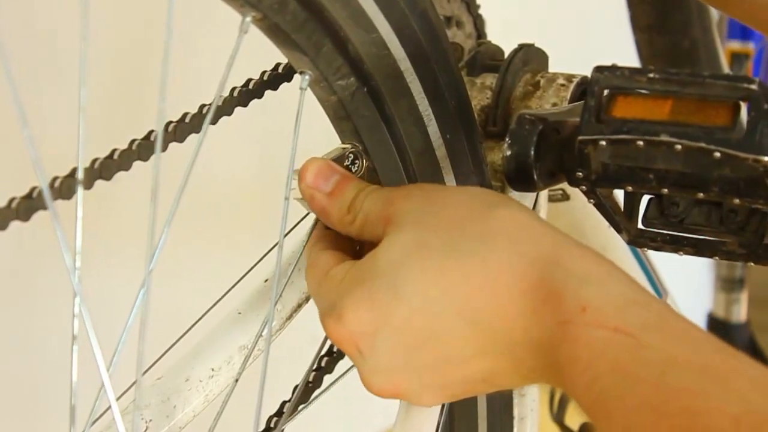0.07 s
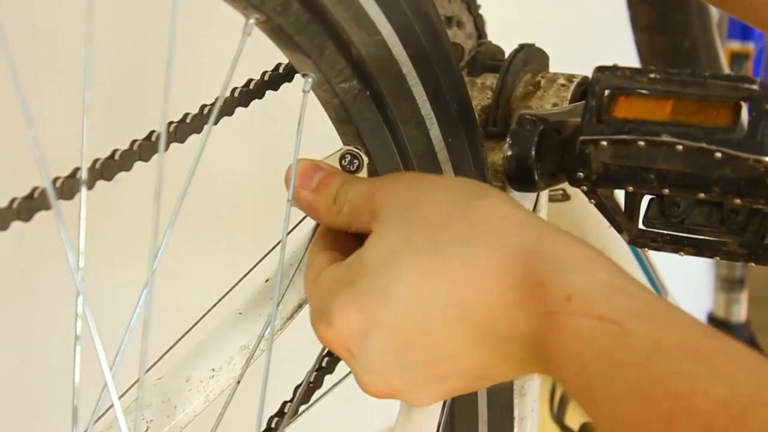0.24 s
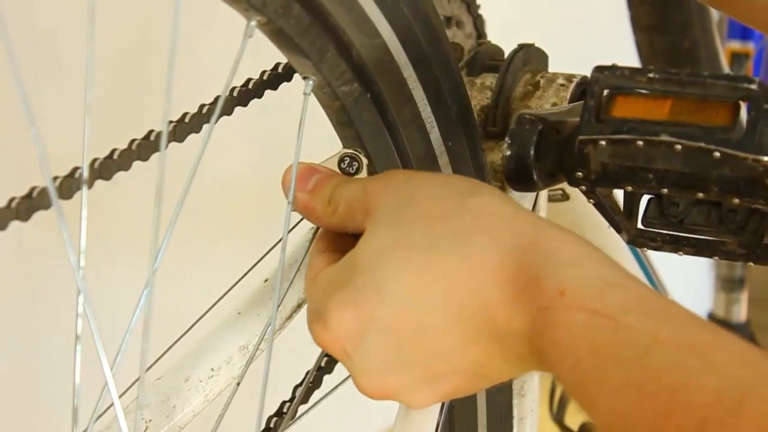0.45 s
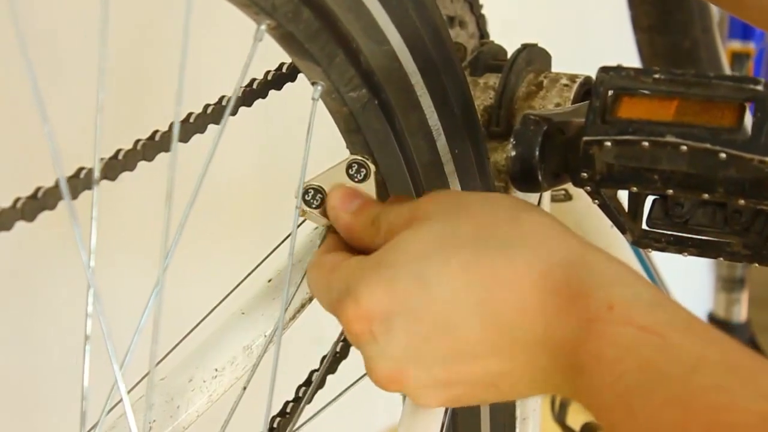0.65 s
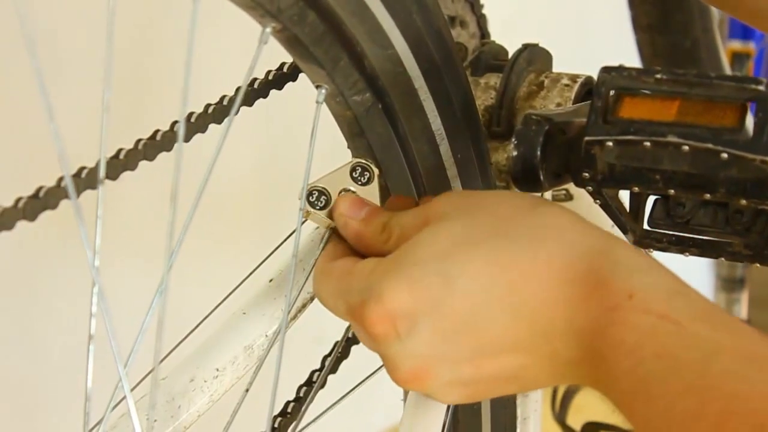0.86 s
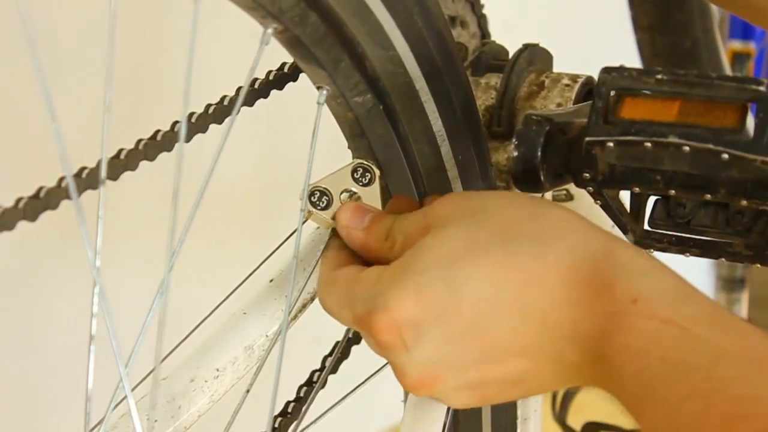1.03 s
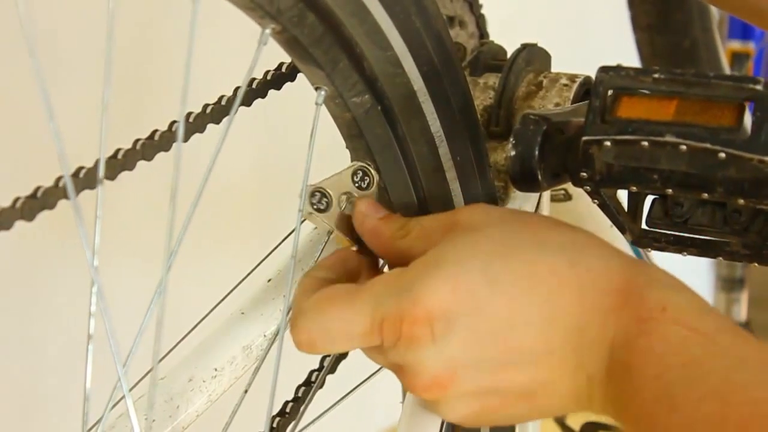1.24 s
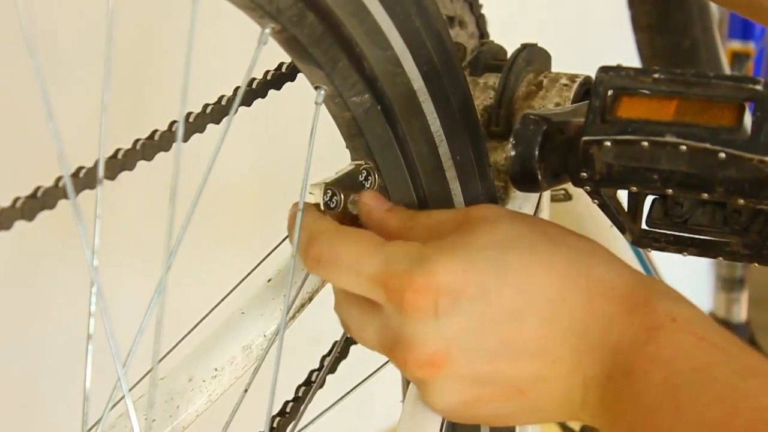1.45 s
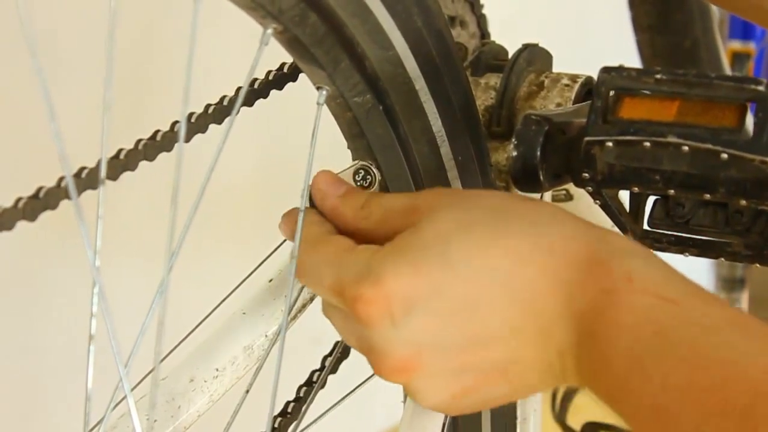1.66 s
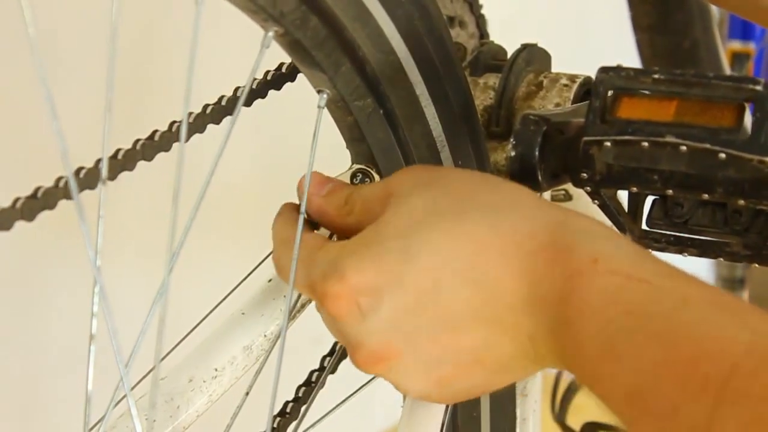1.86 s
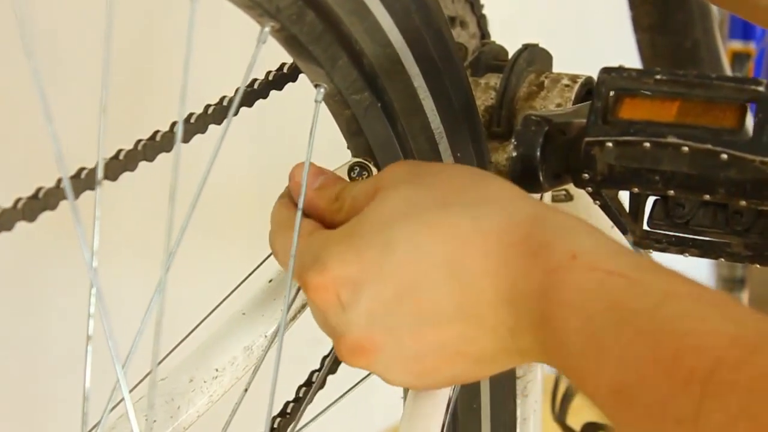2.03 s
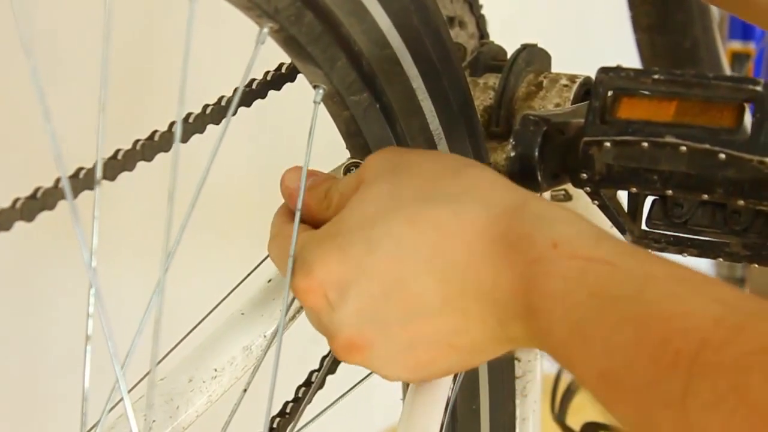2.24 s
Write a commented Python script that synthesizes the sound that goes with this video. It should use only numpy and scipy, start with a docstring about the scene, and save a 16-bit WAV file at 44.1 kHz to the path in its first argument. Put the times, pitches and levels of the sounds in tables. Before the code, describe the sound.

One ringing ping from a bicycle spoke being turned, then a wrench scrapes and clinks briefly.

```python
"""Turning a tight bicycle spoke

In a quiet workshop, a spoke wrench turns a tight nipple, the small nut at the end of a spoke.
The nipple lets go with one sharp crack, and its metallic ring lingers in the room. A second later
the wrench slips off and is put back on with a few scraping clinks, which echo in the small room.
A low hum lies behind it all."""
import sys
import numpy as np
from scipy import signal
from scipy.fft import rfft, irfft
from scipy.io import wavfile

SR = 44100
rng = np.random.default_rng(int(sys.argv[2]) if len(sys.argv) > 2 else 0)


def waveform_to_disk(signal):
    """Save audio, clipped to [-1, 1], as 16-bit WAV at the path in sys.argv[1]."""
    frames = np.transpose(np.atleast_2d(signal))
    scaled = np.clip(frames, -1, 1) * 32767
    samples = np.round(scaled).astype(np.int16)
    wavfile.write(sys.argv[1], SR, samples)


N = 101429  # 2.3 seconds
TOP_HZ = 15700  # upper edge of the treble


def gain(db):
    """Turn decibels into a number to multiply by."""
    return 10 ** (np.asarray(db) / 20)


def read_curve(points, hz):
    """Read between (pitch_hz, value) points, giving every octave equal space."""
    pitches, values = np.array(points, float).T
    return np.interp(np.log(np.maximum(hz, 1)), np.log(pitches), values)


def drift(steps_per_s):
    """A random wander in strength and phase that makes a tone waver."""
    steps = rng.standard_normal((256, 2)) @ np.array([1, 1j])
    return np.interp(np.arange(N) / SR * steps_per_s, np.arange(len(steps)), steps)


def shape_tone(sound, tone, peaks=()):
    """Filter by a tone curve with peaks on top; white noise keeps its overall level."""
    size = 4096
    hz = np.arange(size // 2 + 1) * SR / size
    peaks_db = sum(lift / (1 + (2 * (hz - pitch) / width) ** 2) for pitch, width, lift in peaks)
    cepstrum = irfft(np.log(gain(read_curve(tone, hz) + peaks_db)))
    # fold it so the filter rings only after a hit, never before
    cepstrum[1:size // 2] *= 2
    cepstrum[size // 2 + 1:] = 0
    response = irfft(np.exp(rfft(cepstrum)))
    return signal.fftconvolve(sound, response / np.sqrt(np.sum(response ** 2)))[:N]


def noise(tone, peaks=(), envelope=1):
    """Hiss that follows a loudness outline (the envelope), then has its tone shaped."""
    return shape_tone(rng.standard_normal(N) * envelope, tone, peaks)


def fade(start_s, fade_s, hold_s=0):
    """Start suddenly, hold, then drop by 60 dB every fade_s seconds."""
    t = np.arange(N) / SR - start_s
    return (t >= 0) * np.exp(-np.log(1000) * np.maximum(t - hold_s, 0) / fade_s)


def fading_noise(start_s, fades, hold_s):
    """A burst of hiss in which each range of pitches dies away at its own speed."""
    spectrum = rfft(rng.standard_normal(N))
    hz = np.arange(N // 2 + 1) * SR / N
    pitches = [pitch for pitch, _ in fades]
    burst = 0
    for share, (_, fade_s) in zip(np.eye(len(fades)), fades):
        band = irfft(spectrum * read_curve(list(zip(pitches, share)), hz), N)
        burst += band * fade(start_s, fade_s, hold_s)
    return burst


def ring(start_s, notes):
    """Struck metal: gently wavering notes, together starting at a level of about 1."""
    t = np.arange(N) / SR - start_s
    ringing = 0
    for hz, db, hold_s, fade_s in notes:
        waver = 1 + .3 * drift(steps_per_s=26)
        wave = np.exp(2j * np.pi * (hz * t + rng.random()))
        ringing += gain(db) * np.imag(waver * wave) * fade(start_s, fade_s, hold_s)
    return ringing / np.sqrt(sum(gain(note[1]) ** 2 for note in notes) / 2)


# Tone of the room's steady noise: pitch_hz, relative_level_db
AIR_TONE = [(20, -34), (45, -9), (100, -10.5), (135, -6), (170, 1), (300, -6.5), (600, -7), (1000, -4.5),
            (2000, -17.5), (3200, -24), (8000, -29), (15500, -33.5)]
# Notes of the hum: pitch_hz, level_db
HUM_NOTES = [(123, -65.5), (156, -64.5), (244, -64), (670, -76)]


def background():
    """Soft, steady room noise with a few wavering hum notes."""
    t = np.arange(N) / SR
    hum = 0
    for hz, db in HUM_NOTES:
        note = np.real(drift(steps_per_s=6.2) * np.exp(2j * np.pi * hz * t))
        hum += gain(db) * note / np.sqrt(np.mean(note ** 2))
    return gain(-48) * noise(AIR_TONE) + hum


# How long the echo lasts: pitch_hz, fade_s
ECHO_FADES = [(300, 0.93), (2000, 0.92), (5000, 0.88), (9000, 0.37), (15000, .3)]
# Tone of the echo: pitch_hz, relative_level_db
ECHO_TONE = [(300, 8.5), (2000, 3), (4500, -1), (8000, -0.5), (15000, 1.5)]


def room_echo(sound):
    """The workshop sends back a blurred echo that gets duller as it fades."""
    echo = fading_noise(start_s=0.007, fades=ECHO_FADES, hold_s=0.0067)
    echo = shape_tone(echo / np.sqrt(np.sum(echo ** 2)), ECHO_TONE)
    return gain(-5.5) * signal.fftconvolve(sound, echo)[:N]


# Each touch of the wrench: start_s, knock_db, chink_db, chink_pitch_hz, scrape_db, scrape_fade_s
TOUCHES = [(1.1173, -70, -49, 4900, -63, 0.027), (1.125, -48.5, -43, 3930, -53, 0.055),
           (1.2755, -33.5, -46, 4400, -34, 0.14), (1.2897, -25, -35, 4400, -33.5, 0.12),
           (1.2952, -19.5, -34.5, 4400, -37.5, 0.12), (1.311, -20.5, -36.5, 4400, -37, 0.04),
           (1.3935, -24.5, -34.5, 4325, -55, 0.066), (1.4578, -35, -64, 4480, -42, 0.07),
           (1.4645, -40, -60, 4400, -32.5, 0.06), (1.4700, -24, -62, 4500, -43, 0.026),
           (1.6026, -43, -63, 4400, -50.5, 0.071)]
# Tones of the knock on the spoke, the chink of the jaws and the scrape: pitch_hz, relative_level_db
KNOCK_TONE = [(150, -27), (420, -17), (900, -12), (1100, -18.5), (1500, -3), (1700, -5.5), (2100, 2),
              (2550, -7.5), (3200, -8.5), (3900, -29), (8000, -40)]
CHINK_TONE = [(1000, -12), (2800, -1), (3600, 2.5), (4100, -3.5), (4800, -12.5), (5800, -13), (12000, -30)]
SCRAPE_TONE = [(1000, -14.5), (3000, 3), (6200, -6), (7400, 1.5), (10000, -5), (11300, -4), (12500, -6.5),
               (15400, -10), (16000, -16)]
# Pitches the wrench itself boosts: pitch_hz, width_hz, boost_db
WRENCH_BOOSTS = [(3200, 200, 4), (4020, 160, 5), (4400, 150, 8), (4720, 130, 7), (5550, 200, 5),
                 (7870, 200, 8), (9100, 300, 5), (11170, 200, 10), (11850, 300, 5), (13150, 350, 8),
                 (14930, 150, 8)]
# Notes of the wrench against the spoke: pitch_hz, relative_level_db, hold_s, fade_s
WRENCH_NOTES = [(1490, -8, 0, .5), (1825, -8, 0, .5), (1903, -3, 0, .6), (2075, -3, 0, .55),
                (2172, 0, 0, .6), (2420, -8, 0, .5)]


def wrench_clinks():
    """Each touch scrapes, chinks and knocks, leaving the metal ringing; the room answers."""
    t = np.arange(N) / SR
    knock, chink, ringing = 0, 0, 0
    # the jaws slide along the spoke, loudest at 1.27 s, just before the main knocks
    scrape = gain(-55) * np.exp(-np.abs(t - 1.27) / 0.082)
    for start_s, knock_db, chink_db, chink_hz, scrape_db, scrape_fade_s in TOUCHES:
        # hypot adds up the energy of touches that overlap
        knock = np.hypot(knock, gain(knock_db) * fade(start_s, fade_s=0.039))
        chink = np.hypot(chink, gain(chink_db) * fade(start_s, fade_s=0.066))
        scrape = np.hypot(scrape, gain(scrape_db) * fade(start_s, scrape_fade_s))
        ringing += gain(knock_db - 15.5) * ring(start_s, WRENCH_NOTES)
        # the two jaws ring at slightly different pitches
        jaw_notes = [(chink_hz, 0, 0, 0.2), (chink_hz * 1.072, -4, 0, 0.2)]
        ringing += gain(chink_db - 10) * ring(start_s, jaw_notes)
    touches = (noise(KNOCK_TONE, envelope=knock)
               + noise(CHINK_TONE, WRENCH_BOOSTS, envelope=chink)
               + noise(SCRAPE_TONE, WRENCH_BOOSTS, envelope=scrape))
    return touches + ringing + room_echo(touches)


# Tones of the crack, the buzzing wrench and the ping's echo: pitch_hz, relative_level_db
CRACK_TONE = [(150, -32), (400, -15), (750, -6), (1050, -9), (1500, -4), (2100, 1), (3800, -8), (5500, -5),
              (6500, 3), (7800, -14), (10500, -9), (13000, -1), (15000, -14)]
BUZZ_TONE = [(120, -45), (350, -21.5), (750, -5), (1050, -1.5), (1500, -7), (2100, 6.5), (3800, -7),
             (6500, 4), (7800, -15), (12800, -2), (15500, -17)]
PING_ECHO_TONE = [(150, -30.5), (450, -17), (1050, -13), (1350, -3), (2300, -2.5), (2750, -8.5),
                  (4000, -14), (5250, -13), (5650, -20), (5950, -7), (6750, -13.5), (7800, -28.5),
                  (8400, -23), (13200, -23), (15000, -42)]
# Notes of the spoke: pitch_hz, relative_level_db, hold_s, fade_s
SPOKE_NOTES = [(613, -18, .1, 2.0), (669, -22, .5, 2.6), (711, -12, .06, 1.4), (1206, -7, .08, 1.0),
               (1366, -4, .06, 1.1), (1488, -3, .06, 1.0), (1515, -3, .06, 1.0), (1832, 0, .06, .85),
               (2432, -8, .22, .6), (2450, -.5, .22, .6), (2798, -8, .08, .95), (3382, -14, .2, .85),
               (4273, -8.5, .1, .8), (5915, -6, .12, .62), (6097, -8, .06, .75)]
# How long the ping echoes in the room: pitch_hz, fade_s
PING_ECHO_FADES = [(400, 1.0), (2000, 0.98), (6000, 0.76), (10000, .5), (15000, 0.29)]
# Pitches of the rim and nearby spokes that stand out in the echo: pitch_hz, width_hz, boost_db
PING_ECHO_BOOSTS = [(1180, 50, 6), (2200, 70, 5), (2400, 70, 5), (3210, 50, 5), (3630, 50, 8),
                    (4280, 130, 7), (4810, 170, 9), (6400, 130, 4), (6660, 140, 8), (9110, 100, 14),
                    (12920, 120, 6), (13610, 130, 8), (14200, 90, 12)]


def spoke_ping(start_s):
    """The nipple cracks loose, the wrench buzzes on it, and its metallic ring lingers in the room."""
    t = np.arange(N) / SR - start_s
    click_s = .0018  # a rising sweep this short is heard as one click
    sweep = np.sqrt(2) * np.sin(np.pi * TOP_HZ * t ** 2 / click_s)
    click = sweep * ((t >= 0) & (t < click_s))
    crack = gain(-7.7) * shape_tone(click, CRACK_TONE)
    buzz = gain(-14.5) * noise(BUZZ_TONE, envelope=fade(start_s, fade_s=.035, hold_s=.010))
    spoke = gain(-24.7) * ring(start_s, SPOKE_NOTES)
    echo = fading_noise(start_s, PING_ECHO_FADES, hold_s=0.12)
    echo = gain(-24.8) * shape_tone(echo, PING_ECHO_TONE, PING_ECHO_BOOSTS)
    return crack + buzz + spoke + echo


def scene():
    """Mix the ping, the clinks and the background into one channel."""
    return (spoke_ping(start_s=0.249) + wrench_clinks() + background())[None]


def record(dry):
    """Flatten any peaks of the crack that pass full scale, then cut the highest treble."""
    treble_cut = signal.ellip(8, .2, 70, TOP_HZ, fs=SR, output="sos")
    return signal.sosfilt(treble_cut, np.clip(dry, -1, 1))


dry = scene()
out = record(dry)
waveform_to_disk(out)
```